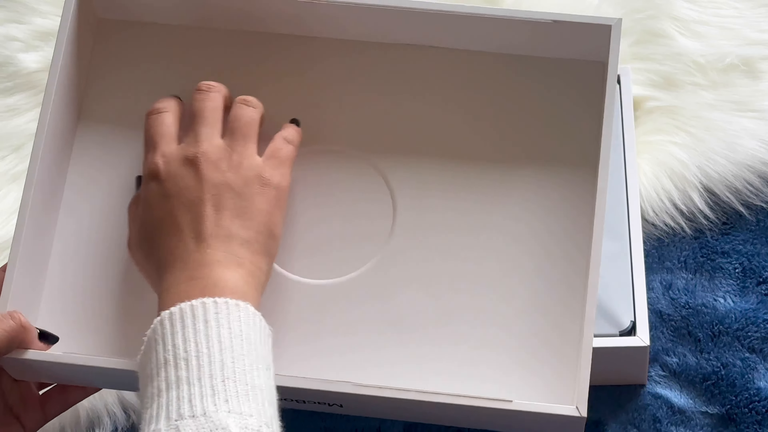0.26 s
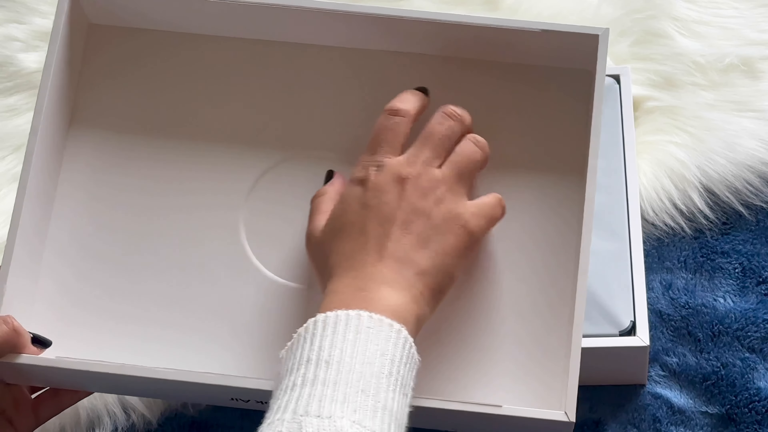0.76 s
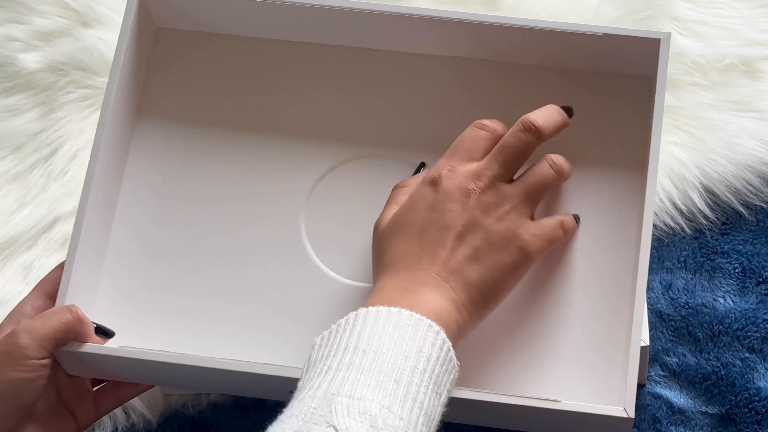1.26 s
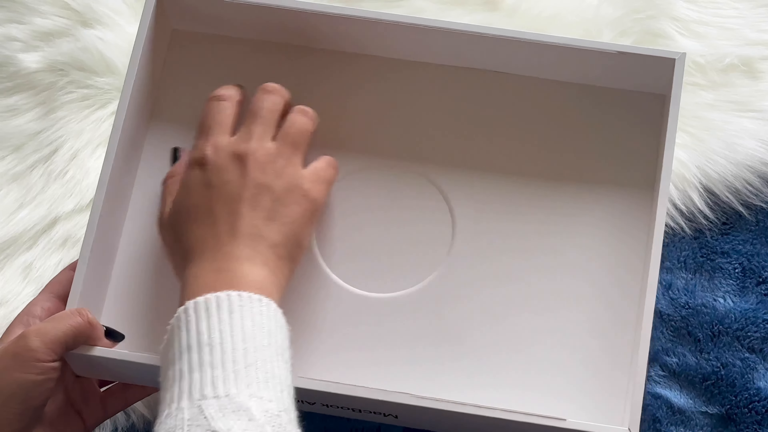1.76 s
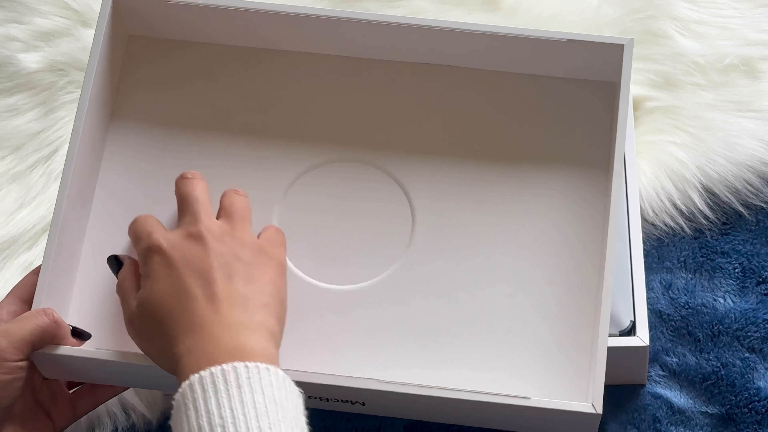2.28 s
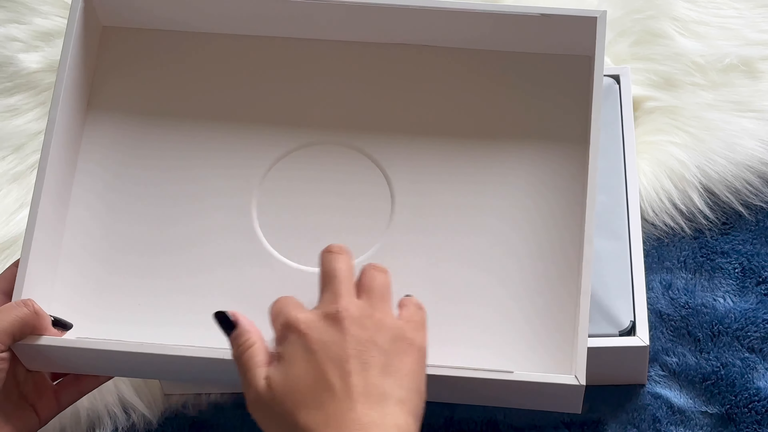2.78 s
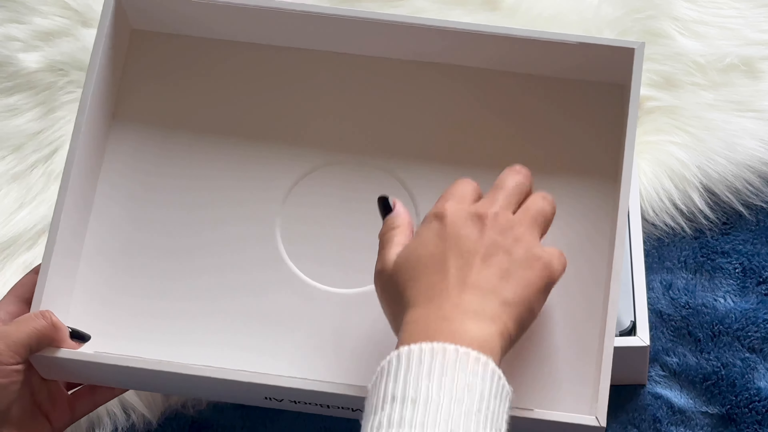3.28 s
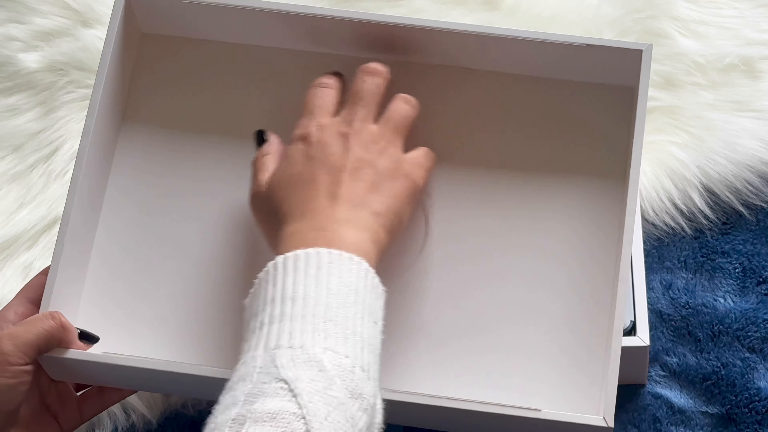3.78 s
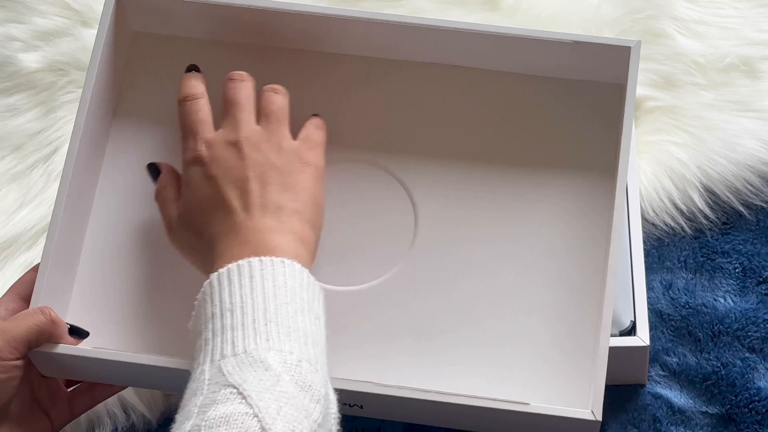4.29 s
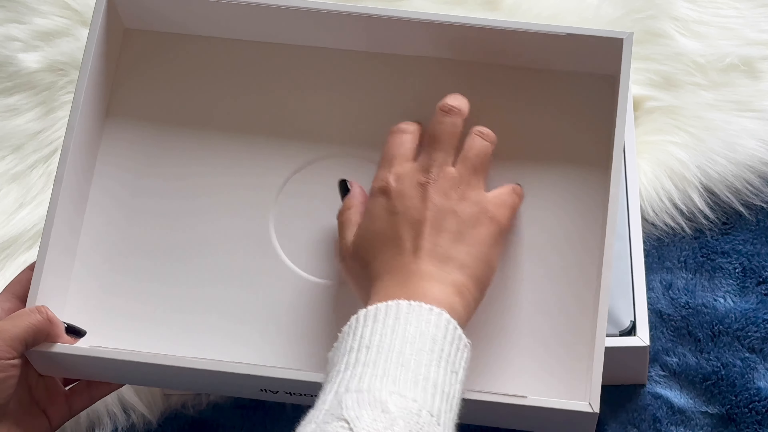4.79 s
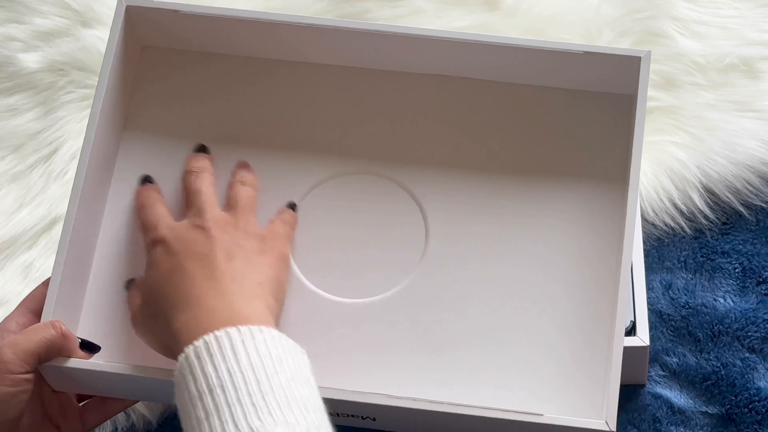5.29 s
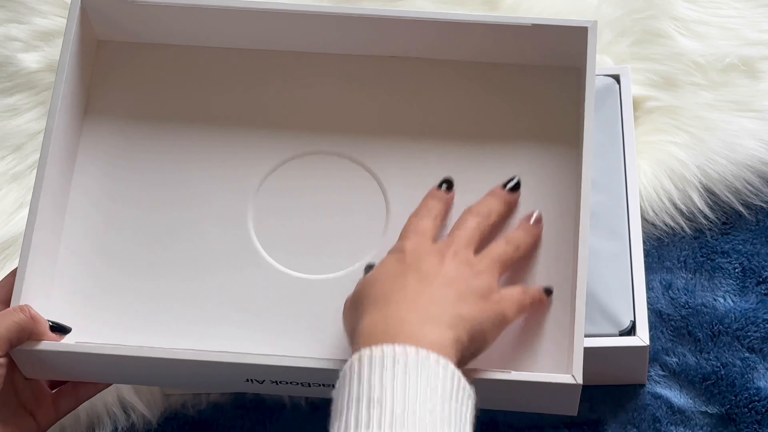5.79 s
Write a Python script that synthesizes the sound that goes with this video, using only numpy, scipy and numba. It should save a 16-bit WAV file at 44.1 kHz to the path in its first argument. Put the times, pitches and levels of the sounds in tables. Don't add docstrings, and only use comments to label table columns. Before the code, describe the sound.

Fingernails drum and drag on the inside of a stiff cardboard lid held in one hand. Sharp clicks with short hollow knocks mix with raspy scratches as the hand circles the surface. From about 5.2 seconds the taps almost stop and flat fingertips sweep in smoother, brighter hisses. Very close stereo microphone, quiet soft-furnished room, hardly any echo, faint sleeve rustle.

```python
import sys
import numpy as np
from scipy import signal
from scipy.fft import rfft, irfft, next_fast_len
from scipy.io import wavfile
from scipy.ndimage import uniform_filter1d
from numba import njit

SR = 44100
rng = np.random.default_rng(int(sys.argv[2]) if len(sys.argv) > 2 else 0)


def output_pcm(signal):
    pcm = np.clip(np.atleast_2d(signal).T, -1, 1) * 32767
    wavfile.write(sys.argv[1], SR, np.round(pcm).astype(np.int16))


def voltage_ratio(level):
    return 10 ** (np.asarray(level, float) / 20)


N = 266784


def unit(x):
    return x / np.sqrt(np.mean(x ** 2))


def colour(x, points):
    size = next_fast_len(N)
    hz, db = np.transpose(points)
    bins_hz = np.arange(size // 2 + 1) * SR / size
    gain = voltage_ratio(np.interp(np.log(bins_hz + 1), np.log(hz), db))
    return irfft(rfft(x, size) * gain, size)[..., :N]


def sides(pan_db):
    return voltage_ratio(np.array([pan_db, -pan_db]) / 2)


def pair(alike):
    mid, side = rng.standard_normal((2, N))
    alike = np.clip(alike, 0, 1)
    side = side * np.array([[1], [-1]])
    return np.sqrt((1 + alike) / 2) * mid + np.sqrt((1 - alike) / 2) * side


def grit(flicker_db, rate):
    size = int(SR / rate)
    steps = np.repeat(rng.standard_normal(N // size + 1), size)[:N]
    return unit(voltage_ratio(flicker_db * uniform_filter1d(steps, size)))


@njit
def svf(x, hz, width):
    y, band, low = np.empty(len(x)), 0., 0.
    for i in range(len(x)):
        g, k = np.tan(np.pi * hz[i] / SR), width / hz[i]
        v = (band + g * (x[i] - low)) / (1 + g * (g + k))
        band, low, y[i] = 2 * v - band, low + 2 * g * v, k * v
    return y


def resonate(x, hz, width):
    return np.array([svf(c, hz, width) for c in x])


# f/Hz, density/dB per Hz
ROOM_SPECTRUM = [(30, -34), (180, 14), (260, 7.5), (393, 0), (1180, -3.5), (1710, -15.5), (3720, -14),
                 (4770, -23), (8910, -26.5), (11700, -46), (15200, -67), (22000, -120)]


def room_tone():
    return voltage_ratio(-48.5) * unit(colour(pair(alike=0.13), ROOM_SPECTRUM))


# start/s, end/s, hiss level at start/dB, hiss level at end/dB
STROKES = [(0, 0.092, -47.5, -64.5), (0.086, 0.403, -53, -44.5), (0.405, 0.647, -52.5, -39.5),
           (.651, 0.731, -58, -44), (0.729, 0.775, -64, -37), (0.785, 0.861, -41.5, -68),
           (0.879, 0.937, -39, -59), (0.936, 1.016, -37.5, -62.5), (1.04, 1.131, -44, -54.5),
           (1.148, 1.26, -45, -56), (1.248, 1.33, -40, -50.5), (1.31, 1.425, -37.5, -43),
           (1.426, 1.574, -36.5, -28.5), (1.57, 1.677, -35.5, -32.5), (1.745, 1.816, -39, -37),
           (1.871, 1.935, -45.5, -44), (2.019, 2.198, -36.5, -46), (2.174, 2.2, -46.5, -33.5),
           (2.207, 2.257, -49, -58), (2.241, 2.283, -52.5, -35), (2.289, 2.365, -37.5, -33),
           (2.468, 2.548, -36.5, -57.5), (2.536, 2.62, -42, -41.5), (2.62, 2.684, -43, -42),
                 (2.673, 2.722, -44.5, -42), (2.754, 2.816, -46.5, -35), (2.919, 2.987, -51.5, -46.5),
                 (3.04, 3.056, -27.5, -46.5), (3.109, 3.134, -61, -35), (3.217, 3.254, -40.5, -71),
                 (3.254, 3.274, -43, -38.5), (3.3, 3.354, -65, -35.5), (3.428, 3.499, -47, -42),
                 (3.512, 3.574, -44, -48.5), (3.55, 3.643, -51.5, -45), (3.678, 3.726, -43.5, -33),
                 (3.725, 3.815, -30.5, -29), (3.818, 3.871, -35, -27), (3.878, 3.898, -34.5, -36),
                 (3.942, 3.999, -35, -31.5), (4.021, 4.079, -40, -36), (4.088, 4.172, -44.5, -60.5),
                 (4.191, 4.26, -38, -69), (4.251, 4.332, -42, -41.5),
           (4.478, 4.511, -36.5, -48), (4.512, 4.554, -68, -35.5), (4.641, 4.673, -43.5, -40.5),
                (4.668, 4.739, -48.5, -51), (4.795, 4.814, -34.5, -37), (4.811, 4.862, -46, -41.5),
                (4.855, 4.968, -42.5, -30.5), (4.953, 5.083, -38, -30.5), (5.074, 5.156, -32, -27.5),
                (5.16, 5.242, -28, -47.5), (5.236, 5.459, -39.5, -41), (5.43, 5.6, -37, -28),
                (5.59, 5.75, -28, -28), (5.74, 5.844, -25.5, -43), (5.802, 6.07, -32, -29)]


def strokes():
    lift_s, lift_db, lift_db_per_s = .007, -18, -200
    t, gain = np.arange(N) / SR, voltage_ratio(-95)
    for start, end, from_db, to_db in STROKES:
        rubbing_db = np.interp(t, [start, end], [from_db, to_db])
        lifted_db = to_db + lift_db * np.minimum((t - end) / lift_s, 1) + lift_db_per_s * (t - end)
        db = np.where(t < end, rubbing_db, lifted_db)
        gain = np.maximum(gain, (t >= start) * voltage_ratio(db))
    return 20 * np.log10(gain)


# f/Hz, gain/dB
HISS = [(300, -58), (1200, 2), (2200, 10.5), (3000, 9), (4300, 1.5), (5600, 1), (7000, -1.5), (9000, -17.5),
        (12000, -56), (16000, -99.5)]
# t/s, f/Hz
SONG = [
    [(0.0, 3880), (0.144, 4700), (0.172, 4030), (0.328, 4030), (0.358, 4400), (0.392, 4040), (0.658, 4830),
     (0.836, 5000), (0.87, 4500)],
    [(0.87, 4570), (1.036, 5240), (1.2, 4400), (1.234, 4800), (1.308, 4630), (1.504, 5570), (1.574, 4330),
     (1.664, 4700), (1.73, 4570)],
    [(1.73, 4300), (1.91, 5050), (1.932, 5840), (1.958, 5500), (1.97, 4820), (2.242, 4700), (2.354, 5900),
     (2.416, 5750), (2.43, 5330)],
    [(2.43, 4440), (2.504, 4670), (2.618, 4660), (2.648, 3920), (2.772, 4130), (2.834, 3740), (3.32, 4800),
     (3.35, 4800), (3.4, 4470)],
    [(3.4, 4810), (3.636, 5140), (3.658, 3930), (3.792, 5020), (3.844, 4700), (4.134, 5100), (4.162, 4230),
     (4.358, 4400), (4.4, 4020)],
    [(4.4, 4260), (4.588, 4600), (4.726, 5140), (4.86, 4470), (4.91, 4970), (4.962, 5070), (5.026, 4750),
     (5.2, 4380), (5.25, 4840)],
    [(5.25, 4850), (5.334, 5600), (5.454, 5310), (5.586, 4370), (5.658, 4860), (5.742, 4830), (5.82, 5660),
     (5.944, 4040), (6.05, 4280)],
]


def nail_hiss(rough, grip):
    air = colour(pair(alike=1.0) * rough, HISS)
    patches = 0
    for f in 1500 * 1.17 ** np.arange(15):
        patches = patches + grit(flicker_db=4.4, rate=26) ** grip * resonate(air, np.full(N, f), .15 * f)
    song_hz = np.interp(np.arange(N) / SR, *np.concatenate(SONG).T) * grit(flicker_db=.25, rate=25)
    second_nail = 1.234
    song = 0
    for ratio, gain in [(1., 2.6), (second_nail, 1.2), (1 / second_nail, 0.8)]:
        catch = grit(flicker_db=4.5, rate=17) ** grip
        song = song + gain * catch * resonate(patches, ratio * song_hz, 630.)
    return unit(patches + song)


# f/Hz, level/dB, t60/s
BOOM = [(148, 6, 0.13), (172, -5, 0.069), (204.8, -3.5, 0.074)]
# f/Hz, level/dB, t60/s
KNOCK = [(337, 0, 0.032), (438, -11, 0.0085), (507.5, -4.5, 0.021), (647.4, -5, 0.027), (715, -6, 0.02),
         (820, -8.5, 0.028), (933, -7, 0.013), (1126, -6, 0.0045), (1384, -13, 0.014),
         (1673, -11.5, 0.0064), (1855, -16, 0.017), (2650, -6, 0.0027)]


def board_rumble(force_gain, board_hz):
    board = 0
    for mode_hz, db, t60 in BOOM[:2] + KNOCK:
        pole = np.exp(-np.log(1000) / (1.9 * t60 * SR))
        near_db = -5.0 * np.minimum(np.abs(np.log2(mode_hz / board_hz)), 1.6)
        mode_gain = voltage_ratio(db + 3.08 * np.log2(mode_hz / 600) + near_db)
        force = pair(alike=0.89) * grit(flicker_db=3.5, rate=22) * force_gain * mode_gain
        poles = [1, -2 * pole * np.cos(2 * np.pi * mode_hz / SR), pole ** 2]
        board = board + np.sqrt(1 - pole) * signal.lfilter([1, 0, -1], poles, force)
    return signal.sosfilt(signal.butter(5, 2450, fs=SR, output="sos"), board)


# t/s, left minus right/dB, pressure as rumble over hiss/dB,
# nearness of the wall as echo pitch f/Hz, speed as rumble centre f/Hz
HAND = [(0, 1, 14, 4700, 694), (.75, 1, 14, 4700, 670), (1.1, -4.5, 10, 4800, 830),
        (1.36, -4, 8.5, 5000, 866), (1.6, 1, 9.5, 5000, 1100), (1.8, 1, 8.5, 4500, 940),
        (2.1, 2.5, 4, 5000, 1580), (2.33, 5, 6, 5130, 1010), (2.5, 4, 12, 4470, 560),
        (2.75, 2.5, 12, 3950, 740), (3.1, 0.5, 12.5, 3800, 620), (3.45, -5, 14.5, 5000, 730),
        (3.78, 0, 11.5, 4650, 840), (4.2, 1, 7, 5200, 945), (4.6, -3, 10, 5300, 890),
        (5.19, 0.5, 10, 4300, 860), (5.25, 4, -11.5, 5030, 1600), (6.05, -1, -2.5, 4500, 1390)]


def drags():
    t = np.arange(N) / SR
    hand_s, *hand = np.transpose(HAND)
    pan_db, board_db, hollow_hz, board_hz = (np.interp(t, hand_s, c) for c in hand)
    db = strokes()
    effort = np.clip(db + 39.5, -15, 15)
    hiss, rumble = voltage_ratio(db), voltage_ratio(db + board_db + 0.0051 * effort)
    board_hz = board_hz * 2 ** (0.26 * effort)
    lean = uniform_filter1d(20 * np.log10(rumble / hiss), SR // 50)
    hiss, rumble = (uniform_filter1d(c, SR // 250) for c in (hiss, rumble))
    board_hz = (uniform_filter1d(board_hz, SR // 50) + 1) * grit(flicker_db=1.5, rate=20)
    grip = np.clip((board_db + 4) / 12, .35, 1)
    rough = grit(flicker_db=1.3, rate=70) * grit(flicker_db=1.9, rate=260) * grit(flicker_db=2.8, rate=1000)
    rough = rough ** grip
    air = nail_hiss(rough, grip)
    board = board_rumble(rough * rumble, board_hz)
    whisper = unit(colour(pair(alike=0.99), [(5000, -32), (7500, -0.5), (11500, -20.5), (14000, -51)]))
    whisper = voltage_ratio(-17.5 - 0.45 * lean) * whisper
    near = voltage_ratio(1.0) * hiss * air + voltage_ratio(-1.5) * board
    late = np.arange(N) - .9 * SR / hollow_hz
    near = near + .62 * np.array([np.interp(late, np.arange(N), c) for c in near])
    return (near + voltage_ratio(2.4) * hiss * whisper) * sides(pan_db)


def ring(modes, lean_db, skew, swell_s, slap, share_db):
    hz, db, t60 = np.transpose(modes)[:, :, None]
    t = np.maximum(np.arange(SR // 5) / SR - .00025 * (np.sqrt(1000 / hz) - .35), 0)
    share, detune, shift, tilt = rng.standard_normal((4, len(modes), 1))
    db = db + lean_db + share_db * share
    turn = 2 * np.pi * hz * (1 + .012 * detune) * t
    fade = voltage_ratio(db) * np.exp(-np.log(1000) * t / t60) * (1 - np.exp(-t / swell_s))
    fade = fade * (1 + slap * np.exp(-turn))
    ports = []
    for k in (1, -1):
        swing = fade * (1 + k * skew * tilt) * np.sin(turn + k * skew * shift)
        ports.append(-swing.sum(0))
    out = np.array(ports)
    return out / np.abs(out.mean(0)).max()


# f/Hz, level/dB, t60/s
CRACK = [(1140, 6.5, 0.0049), (1640, 0, 0.0042), (2156, 2, 0.003), (2950, 0.5, 0.0017), (3650, 4, 0.002),
         (4353, -1, 0.0049), (5000, -3.5, 0.0057), (6500, -8, 0.0049), (7600, -4.5, 0.0018)]
# t/s, crack level/dB, boom level/dB, knock level/dB, left minus right/dB
TAPS = [(.0074, -3.5, -17.5, -6.5, 5), (.195, -7.5, -16.5, -8, 0.5), (0.2365, -4.5, -18, -7.5, 3),
        (0.4215, -6.5, -16.5, -42, 3), (0.4601, -10.5, -25, -5.5, 0.5), (0.5296, -8.5, -23, -3, 4.5),
        (0.6704, -6, -23.5, -5.5, -6), (0.7478, -9, -19, -51, -7.5),
        (0.7917, -18, -20.5, -14, -21.5), (0.8833, -17.5, -30, -12.5, 25),
        (.904, -23.5, -33, -26, -7), (1.0249, -7, -33, -8, -2), (1.0945, -13.5, -24, -20.5, 21),
        (1.1543, -40, -25.5, -15, 2), (1.299, -6, -27, -6.5, -6.5), (1.384, -8, -18.5, -6.5, 0.5),
        (1.749, -7, -14.5, -6, 0), (1.787, -5.5, -21.5, -1, 1), (2.2818, -14, -32.5, -42, 2),
        (2.466, -9.5, -19.5, -8, 5), (2.482, -18.5, -18.5, -6, 4), (2.5246, -11, -27, -16.5, -13.5),
        (2.7095, -7, -22.5, -7, 3), (2.751, -8, -30, -12, 6.5),
        (3.2253, -14, -17, -6.5, 1), (3.2327, -13.5, -23.5, -26, -13),
                     (3.303, -10.5, -21, -13, 7.5), (3.3159, -19, -16.5, -5.5, -6),
                     (3.446, -10.5, -26, -45, 2), (3.5473, -7, -22.5, -4.5, -5),
                     (3.5564, -53, -21.5, -54, -11), (3.6799, -6, -29, -6, 1.5), (4.0248, -5, -19.5, -1, 0),
                     (4.0339, -7, -53, -13, 2), (4.2572, -17, -21, -9.5, 3), (4.266, -12.5, -28, -15, -5),
                     (4.4667, -1.5, -20.5, -4, 4.5), (4.5279, -4, -23.5, -4.5, 1.5),
                     (4.6365, -6, -15, -1.5, -1), (4.6484, -7.5, -35, -42, 4), (4.812, -5, -23.5, -1, -3.5),
                     (4.8535, -38, -28.5, -20, -10), (5.04, -7, -25, -1.5, -7.5),
                     (5.161, -6, -18, -11.5, -11), (5.1981, -9.5, -11, -3, 1), (5.243, -12, -29, -12.5, 2),
        (0.1008, -6, -45, -11, 3.5), (0.2979, -5.5, -24.5, -9, 2.5), (1.8689, -4, -34, -12.5, 3.5),
             (2.0191, -14, -19.5, -6.5, -6), (2.035, -5, -19, -16, 3), (2.2666, -30, -30, -21, 13),
             (2.9068, -5, -26, -14, -2.5), (2.9471, -7, -19, -6.5, 0.5), (2.9748, -39, -23.5, -18, -7),
             (3.039, -19, -21, -13, 28.5), (3.086, -7.5, -48, -14.5, -4), (3.9421, -4, -34, -9.5, 1),
             (4.1071, -13, -26.5, -15.5, 2), (4.1923, -7, -22.5, -11.5, 2), (4.2828, -11, -46, -10, 8),
             (4.9261, -6, -21, -57, -8.5), (5.648, -44, -23.5, -19, -5), (5.976, -47, -31.5, -55, -4),
        (0.9325, -23, -48, -40, -9), (1.1424, -21, -51, -18.5, -8), (1.259, -9, -44, -15.5, -6),
               (1.5432, -1, -31, -7, -13), (3.0915, -14, -29, -20, -4), (3.1208, -10, -21, -15.5, 10.5),
               (3.4286, -6.5, -21.5, -15.5, 4), (3.7072, -16, -22.5, -23, 1), (3.8566, -5, -35, -3.5, -2.5),
               (5.7468, -44, -33, -20.5, -4)]
# t/s, knock f/Hz, boom f/Hz
SPOTS = [(0.007, 318, 213), (0.101, 517, 215), (0.195, 350, 148), (0.236, 326, 151), (0.297, 503, 215),
         (0.421, 328, 148), (0.46, 340, 153), (0.529, 306, 145), (0.67, 310, 148), (0.747, 328, 145),
         (0.791, 323, 210), (0.883, 326, 145), (1.025, 300, 210), (1.094, 490, 202), (1.154, 328, 207),
         (1.259, 710, 218), (1.298, 304, 210), (1.383, 318, 153), (1.542, 663, 145), (1.748, 340, 153),
         (1.787, 330, 153), (1.868, 520, 207), (2.02, 510, 196), (2.034, 510, 207), (2.265, 770, 183),
         (2.466, 364, 172), (2.482, 363, 148), (2.524, 555, 207), (2.71, 370, 148), (2.751, 358, 151),
         (2.906, 540, 145), (2.947, 552, 143), (2.975, 520, 145), (3.039, 546, 145), (3.087, 598, 140),
         (3.121, 687, 151), (3.225, 317, 145), (3.303, 322, 143), (3.316, 328, 137), (3.428, 708, 175),
         (3.547, 343, 218), (3.68, 627, 140), (3.708, 684, 145), (3.856, 700, 143), (3.942, 477, 207),
         (4.025, 324, 207), (4.107, 495, 210), (4.192, 534, 143), (4.256, 323, 191), (4.466, 330, 145),
         (4.527, 330, 145), (4.636, 310, 156), (4.812, 314, 140), (4.853, 390, 143), (4.927, 342, 143),
         (5.04, 319, 145), (5.161, 623, 159), (5.197, 332, 161), (5.243, 330, 148), (5.647, 617, 151)]


def taps():
    out, t = np.zeros((2, N + SR)), np.arange(SR // 5) / SR
    dent = -np.exp(-t / .00034) * (1 - np.exp(-t / .00004))
    spots = np.array(SPOTS)
    for s, crack_db, boom_db, knock_db, pan_db in TAPS:
        _, knock_hz, boom_hz = spots[np.abs(spots[:, 0] - s).argmin()]
        knock_modes = KNOCK + [(knock_hz, 3.5, 0.033)]
        octaves = np.abs(np.log2(np.array(knock_modes)[:, :1] / knock_hz))
        knock_near_db = -4.0 * np.minimum(octaves, 1.5)
        boom_near_db = -9.0 * np.abs(np.log2(np.array(BOOM)[:, :1] / boom_hz))
        crack = dent + voltage_ratio(-1.77) * ring(CRACK, 0, skew=0.081, swell_s=.00006, slap=0, share_db=4.5)
        crack -= .25 * np.roll(crack, int(SR * rng.uniform(.0004, .0014)), axis=1)
        knock = ring(knock_modes, knock_near_db, skew=0.25, swell_s=0.00036, slap=0.8, share_db=7.0)
        boom = ring(BOOM, boom_near_db, skew=0.38, swell_s=0.0017, slap=0.39, share_db=5.0)
        blow = voltage_ratio(crack_db + 1.0) * crack * sides(pan_db)[:, None]
        blow += voltage_ratio(knock_db + 1.5) * knock * sides(0.73 * pan_db)[:, None]
        blow += voltage_ratio(boom_db + 14.0) * boom
        i = int(s * SR)
        out[:, i:i + blow.shape[1]] += blow
    out = out[:, :N]
    out = out - 0.33 * resonate(out, np.full(N, 291), 65.0)
    return signal.sosfilt(signal.butter(5, 7370, fs=SR, output="sos"), out)


def walls(x):
    t, t60_s = np.arange(SR // 3) / SR, 0.099
    tail = rng.standard_normal((2, len(t))) * np.exp(-np.log(1000) * t / t60_s) * (t > .003)
    tail = signal.lfilter([1], [1, -.6], tail)
    return voltage_ratio(-20) * signal.fftconvolve(x, tail / np.linalg.norm(tail[0]), axes=1)[:, :N]


# f/Hz, density/dB per Hz
SLEEVE = [(2000, -37), (5000, -33), (8000, 2), (11000, -6.5), (13500, -11.5), (15300, -15), (17000, -73)]
# start/s, end/s, level/dB
BRUSHES = [
    (2.09, 2.26, -58),
    (2.267, 2.366, -47.5),
    (2.53, 2.627, -48.5),
    (3.123, 3.148, -44),
    (5.143, 5.214, -48),
    (5.854, 5.933, -38),
]


def sleeve():
    push = np.zeros(N)
    for start, end, db in BRUSHES:
        push[int(start * SR):int(end * SR)] += voltage_ratio(db)
    wool = unit(colour(pair(alike=0.9), SLEEVE))
    low = signal.butter(2, 90, fs=SR, output="sos")
    arm = voltage_ratio(16.5) * unit(signal.sosfilt(low, pair(alike=0.69)))
    return uniform_filter1d(push, SR // 30) * (grit(flicker_db=3.5, rate=40) * wool + arm)


def scene():
    lid = drags() + taps()
    return room_tone() + lid + walls(lid) + sleeve()


# f/Hz, left lead/rad
PORT_PHASE = [(0, 0), (340, 0.31), (950, -0.4), (1210, 1.38), (1550, 0.23), (1810, 0.8), (3270, 0.66),
              (6720, 0.3), (7490, 1.48), (8870, 1.5), (9730, 1), (10500, 1.1), (11500, 0)]


def spaced_ports(x):
    size = next_fast_len(N)
    hz, lead = np.transpose(PORT_PHASE)
    bins_hz = np.arange(size // 2 + 1) * SR / size
    lead = np.interp(np.log(bins_hz + 1), np.log(hz), np.unwrap(lead))
    return irfft(rfft(x, size) * np.exp(.5j * lead * np.array([[1], [-1]])), size)[:, :N]


def band_limit(x):
    return signal.sosfilt(signal.butter(12, 15600, fs=SR, output="sos"), x)


def record(dry):
    dry = spaced_ports(dry)
    thin = signal.sosfilt(signal.butter(4, 181, "high", fs=SR, output="sos"), dry)
    thin = thin + voltage_ratio(-37) * dry
    tremble = signal.butter(3, [52, 92], "band", fs=SR, output="sos")
    thin = thin + voltage_ratio(-65) * unit(signal.sosfilt(tremble, pair(alike=0.89)))
    return band_limit(np.tanh(1.378 * thin) / 1.64)


dry = scene()
out = record(dry)
output_pcm(out)
```